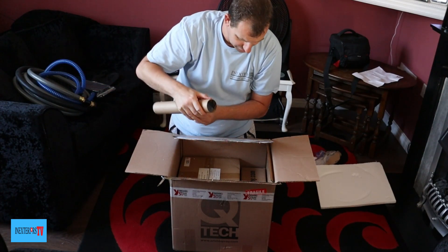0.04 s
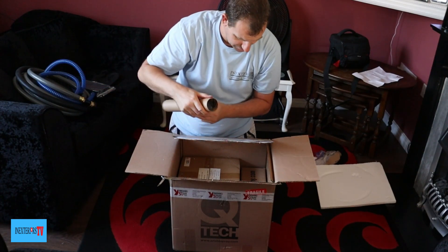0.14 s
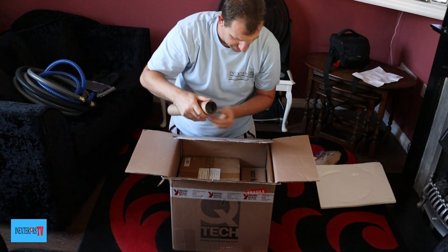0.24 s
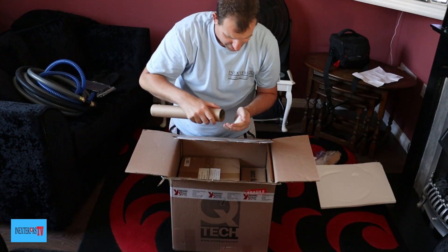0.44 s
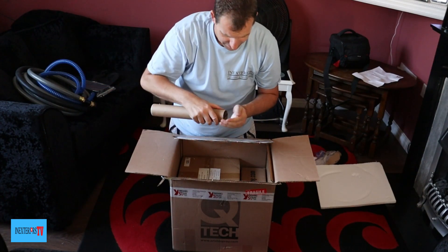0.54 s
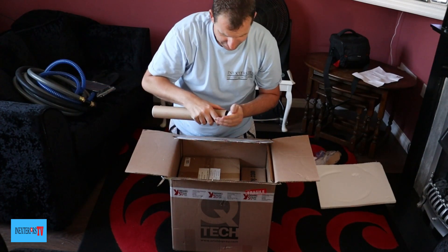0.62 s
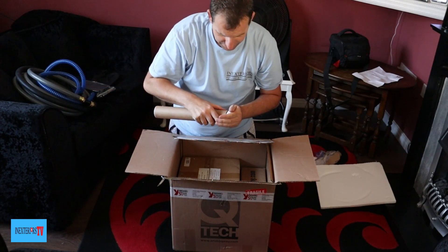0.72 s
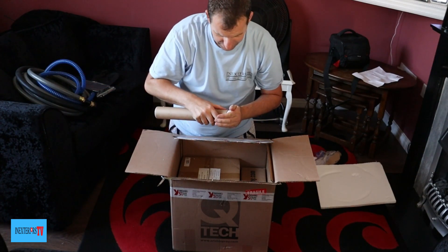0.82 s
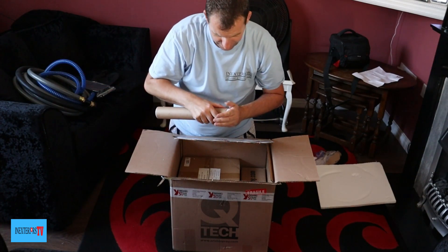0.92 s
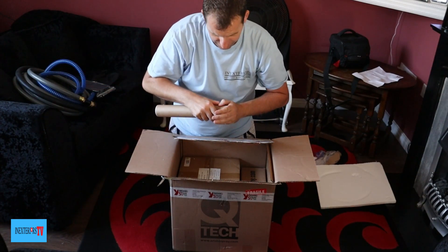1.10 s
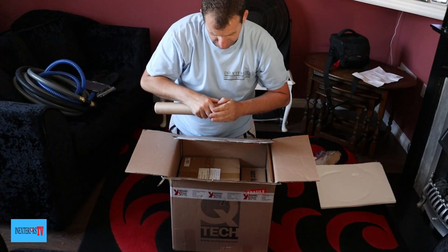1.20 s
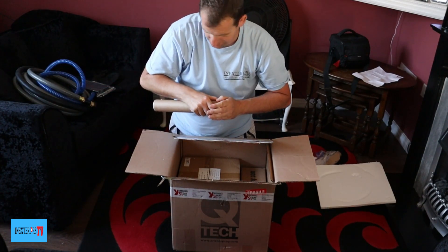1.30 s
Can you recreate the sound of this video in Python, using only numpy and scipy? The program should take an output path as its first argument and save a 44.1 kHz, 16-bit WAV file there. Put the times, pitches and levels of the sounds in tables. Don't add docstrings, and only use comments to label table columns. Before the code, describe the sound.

A cap pops from a cardboard tube with a low hollow boom and rattles in its mouth, after light finger rubs and taps; softer scuffs and dull box bumps follow in a furnished room, with faint hum and hiss.

```python
import sys
import numpy as np
from scipy import signal
from scipy.fft import rfft, irfft
from scipy.io import wavfile
from scipy.ndimage import uniform_filter1d

SR = 44100
rng = np.random.default_rng(int(sys.argv[2]) if len(sys.argv) > 2 else 0)


def undo_db(level):
    steps = np.asarray(level, float) / 20
    return 10 ** steps


def generate_wav(sig):
    pcm = np.round(np.clip(np.atleast_2d(sig).T, -1, 1) * 32767).astype(np.int16)
    wavfile.write(sys.argv[1], SR, pcm)


N = 59535
T = np.arange(N) / SR
POP_S = .2237


def col(table, k):
    a = np.array(table)
    return np.interp(T, a[:, 0], a[:, k])


def unit(x):
    return x / np.sqrt(np.mean(x ** 2))


def clicks(times, db):
    x = np.zeros(N)
    np.add.at(x, (np.asarray(times) * SR).astype(int), undo_db(np.asarray(db)))
    return x


def ring(x, hz, t60):
    pole = np.exp(2j * np.pi * hz / SR - np.log(1000) / (t60 * SR))
    return signal.lfilter([1], [1, -pole], x).imag


def flutter():
    depth_db, smooth_s = 3, .008
    k = int(smooth_s * SR)
    walk = uniform_filter1d(uniform_filter1d(rng.standard_normal(N), k), k)
    return undo_db(depth_db * unit(walk))


def modes(x, table):
    return sum((-1) ** k * undo_db(db) * flutter() * ring(x, hz, t60) for k, (hz, db, t60) in enumerate(table))


def bands(x, table):
    return sum(undo_db(db) * signal.lfilter(*signal.iirpeak(hz, hz / width, SR), x) for hz, width, db in table)


def twice(x, hz, width):
    return bands(bands(x, [(hz, width, 0)]), [(hz, width, 0)])


def burst(x, fade_s):
    envelope = signal.lfilter([1], [1, -np.exp(-1 / (fade_s * SR))], x)
    return envelope * rng.standard_normal(N)


def swells(table):
    out = np.zeros(N)
    for s, rise, hz, db, t60 in table:
        age = np.clip(T - s, 0, None)
        swell = 1 - np.exp(-(age / rise) ** 2)
        out += undo_db(db - 60 * age / t60) * swell * np.sin(2 * np.pi * hz * age)
    return out


# t/s, level/dB
HUM_LEVEL = [
    (0, -63),
    (.3, -58.5),
    (.6, -55),
    (.9, -50),
    (1.35, -50),
]


def mains_hum():
    return np.sqrt(2) * undo_db(col(HUM_LEVEL, 1)) * np.sin(2 * np.pi * 50.1 * T + 2.4)


# f/Hz, level/dB per Hz
HISS_COLOUR = [(40, 1), (100, -10), (220, -8.5), (500, -12.5), (900, -11.5), (2200, -21.5), (5000, -24),
               (16000, -27.5)]


def hiss():
    hz, db = np.array(HISS_COLOUR).T
    f = np.fft.rfftfreq(N, 1 / SR) + 1
    colour = undo_db(np.interp(np.log(f), np.log(hz), db))
    return undo_db(-53) * unit(irfft(rfft(rng.standard_normal(N)) * colour, N))


# f/Hz, width/Hz, level/dB
SKIN = [(508, 63, -6), (650, 48, -1.5), (910, 413, 7.5), (1180, 570, -26), (2155, 520, 3.5),
        (2700, 750, -2), (3666, 860, -0.5), (5020, 260, -1)]


def skin(x):
    return signal.lfilter(*signal.butter(2, 5000, fs=SR), bands(x, SKIN))


RUB_STARTS = [.455, .525, .75, -.004, 1.152, 1.12, 1.185, .08, 1.135, 1.2, .49, .8, -.01, .125]
# length/s, f/Hz, width/Hz, level/dB
RUBS = [(0.046, 1700, 150, -58), (0.027, 1070, 150, -50), (0.12, 1326, 130, -54), (0.015, 3240, 4200, -30),
        (0.019, 900, 450, -38), (0.1, 280, 190, -49.5), (0.017, 654, 100, -51), (0.037, 490, 35, -61),
        (0.057, 2020, 580, -47), (0.022, 860, 80, -43.5), (0.047, 2530, 300, -45), (0.052, 4250, 1700, -50),
        (0.19, 4200, 5900, -45), (0.076, 3600, 3900, -42.5)]


def rubs():
    noise = rng.standard_normal(N)
    out = np.zeros(N)
    for s, (length, hz, width, db) in zip(RUB_STARTS, RUBS):
        arch = np.sin(np.pi * np.clip((T - s) / length, 0, 1))
        out += undo_db(db) * arch * unit(twice(noise, hz, width))
    return out


# f/Hz, width/Hz, level/dB
PAPER = [(6000, 2100, -2), (8800, 2900, -12), (10480, 1000, -9), (11800, 560, -14), (15300, 1400, -20)]


def paper(x, extra=()):
    return bands(x, PAPER + list(extra))


# t/s, pressure level/dB, crispness level/dB
SCUFF = [(0, -41, -9), (.05, -42.5, -6.5), (.11, -37, -15), (.2, -43.5, -4.5), (.29, -35.5, -6.5),
         (.37, -50.5, -9), (.46, -50.5, -10), (.5, -39.5, -8), (.58, -63, -10), (.68, -98, -5),
         (.7, -55.5, -36), (.79, -56, -16), (.82, -44.5, -6.5), (.9, -60, -8.5), (1.02, -51.5, -8.5),
         (1.09, -60.5, -8), (1.17, -45, -7.5), (1.35, -61.5, -10)]


def scuff():
    grains_per_s, spread_db, smooth_share = 4000, 2.5, .7
    chosen = rng.random(N) < grains_per_s / SR
    slips = chosen * undo_db(spread_db * rng.exponential(size=N)) * rng.standard_normal(N)
    friction = unit(np.clip(slips, -4, 4)) + smooth_share * rng.standard_normal(N)
    crisp = undo_db(col(SCUFF, 2)) * unit(paper(friction, [(6230, 2400, 0)]))
    air = undo_db(-9) * unit(ring(friction, 223.7, .13))
    return undo_db(col(SCUFF, 1)) * (unit(skin(friction)) + crisp + air)


# t/s, body level/dB, bright snap level/dB, length/s
TAPS = [(0, -43.5, -30.5, 0.0074), (.008, -33, -45, 0.00079), (0.04, -58, -47, 0.0021),
        (0.065, -54, -31.5, 0.0037), (0.09, -53, -32, 0.002), (0.103, -27.5, -26.5, 0.0028),
        (0.1082, -31, -19.5, 0.0021), (0.111, -33.5, -29, 0.007), (0.133, -38, -35, 0.0074),
        (0.4786, -33.5, -36, 0.0031), (0.4855, -37, -33, 0.0024), (0.496, -38.5, -62, 0.004),
        (0.501, -33, -56, 0.0033), (0.51, -69, -50, 0.012), (0.696, -68, -54.5, 0.014),
        (0.798, -44.5, -45, 0.004), (0.809, -45.5, -57, 0.009), (0.821, -37, -57, 0.0047),
        (0.847, -57, -62, 0.0079), (0.867, -71, -65, 0.0033), (0.937, -55, -72, 0.019),
        (1.012, -47, -76, 0.0049), (1.098, -49, -70, 0.017), (1.115, -44.5, -54, 0.015),
        (1.152, -41, -53, 0.0048), (1.189, -42.5, -61, 0.0074), (1.232, -49, -58, 0.0048),
        (1.249, -55, -60, 0.0056), (1.28, -69, -64, 0.0026), (1.287, -47, -70, 0.0082)]


def taps():
    rise_s = .0016
    body, snap = np.zeros(N), np.zeros(N)
    for s, body_db, snap_db, length in TAPS:
        age = np.abs(T - s)
        shape = (T > s) * np.exp(-age / length) * (1 - np.exp(-age / rise_s))
        body += undo_db(body_db) * shape
        snap += undo_db(snap_db) * shape
    body *= rng.standard_normal(N)
    snap *= rng.standard_normal(N)
    return undo_db(7) * skin(body) + undo_db(9) * paper(snap)


PING_STARTS = [.262, .255, .272, .25, .315, .31, .318, .32, .31, .388, .405, .46, .1082, .1085, .008, .03,
               .022, .117, .762, .823, .825, .852, .876, 1.006, 1.035, 1.116, 1.119, 1.118, 1.124, 1.154,
               1.191, 1.184, 1.212, 1.236, 1.246, 1.272, 1.273, 1.29, 1.291, .2245, .2265]
PING_PITCHES = [500, 362, 870, 1060, 800, 680, 488, 1104, 296, 455, 1350, 1120, 10700, 12100, 12000, 11000,
                2200, 2250, 1180, 2080, 850, 1020, 900, 2090, 900, 3800, 860, 2250, 2050, 2090, 673, 4700,
                860, 2050, 900, 880, 2100, 860, 2150, 1354, 424]
# rise/s, level/dB, t60/s
PINGS = [(0.0049, -29.5, 0.18), (0.0077, -28, 0.096), (0.003, -30, 0.068), (0.0077, -26, 0.048),
         (0.0072, -27.5, 0.16), (0.0097, -35.5, .22), (0.009, -36, 0.24), (0.0051, -32, 0.14),
         (0.014, -45.5, 0.57), (0.0053, -44, 0.19), (0.0092, -45.5, 0.15), (0.011, -42, 0.28),
         (0.00024, -16, 0.0072), (0.00038, -17, 0.0078), (0.00046, -24, .006), (.0005, -34, 0.013),
         (0.0021, -38, .04), (0.0022, -30.5, 0.047), (0.0051, -41, .07), (0.0016, -35.5, 0.03),
         (0.0022, -39.5, 0.071), (0.0036, -38, .06), (.001, -38, 0.035), (0.0017, -44, 0.036),
         (0.0036, -44.5, .07), (0.0009, -54, 0.015), (0.0015, -36.5, 0.048), (0.00073, -45, 0.017),
         (0.00093, -37.5, 0.033), (0.00091, -29.5, 0.028), (0.0015, -35, 0.048), (0.00085, -42, .015),
         (.003, -39, 0.054), (0.0017, -40, 0.036), (.003, -42, .06), (0.0013, -39, 0.032),
         (0.0017, -40.5, 0.031), (0.0015, -40.5, .06), (0.0025, -41, 0.038), (.002, -26.5, 0.04),
         (0.0038, -26, 0.059)]


def pings():
    grains = zip(PING_STARTS, PING_PITCHES, PINGS)
    return swells([(s, rise, hz, db, t60) for s, hz, (rise, db, t60) in grains])


# t/s, level/dB, f/Hz
BUMPS = [
    (.05, -41, 82),
    (0.086, -39, 139),
    (1.123, -36, 92),
    (1.16, -38, 92),
    (1.1, -54, 92),
]


def bumps():
    return sum(ring(uniform_filter1d(clicks([s], db), size=200), hz, .12) for s, db, hz in BUMPS)


# t/s, rise/s, f/Hz, level/dB, t60/s
STIRS = [
    (.092, 0.033, 223.9, -24.5, 0.32),
    (0.489, 0.0021, 300, -40, 0.081),
    (0.826, 0.0028, 228.5, -33.5, 0.16),
    (.872, 0.0059, 469, -37, 0.11),
    (1.152, 0.0029, 231, -47, 0.15),
    (1.215, 0.0092, 222, -66, 0.11),
    (.74, 0.017, 225, -51.5, 0.26),
]


def stirs():
    return swells(STIRS)


# t/s, level/dB
BOOM = [
    (.224, -12.5),
    (.242, -11.5),
    (.258, -15),
    (.3, -17),
    (.318, -30.5),
    (.338, -29),
    (.416, -39),
    (.456, -47),
    (.6, -64),
]


def boom():
    rise = np.clip((T - POP_S) / .002, 0, 1) * (T < BOOM[-1][0])
    tone = np.sin(2 * np.pi * 226.3 * (T - POP_S) - 1.5)
    return np.sqrt(2) * rise * undo_db(col(BOOM, 1)) * tone


# f/Hz, level/dB, t60/s
WALL = [(343, -17.5, 0.054), (420, -8, 0.052), (479, -18, 0.056), (506, -9.5, 0.043), (656, -11.5, 0.083),
        (688, -10.5, 0.094), (712, -9.5, 0.05), (806.3, -8.5, 0.13), (855, -3, 0.052), (958, -1.5, 0.016),
        (1055, -5.5, 0.057), (1356, -2.5, 0.032), (1670, -6.5, 0.02), (2074, -2, 0.04)]


def wall(blows):
    push = np.hanning(int(.00055 * SR) + 3)
    return modes(np.convolve(blows, push / push.sum())[:N], WALL)


# f/Hz, level/dB, t60/s
CAP = [(2286, -12, 0.028), (2350, -9.5, 0.15), (2516, 5.5, 0.007), (2530, -9, 0.091), (2640, -5.5, 0.0029),
       (2847, -9.5, 0.028), (3750, -11.5, 0.012), (5140, -29, 0.0023)]


def cap(blows):
    return undo_db(-3.5) * twice(modes(blows, CAP), 2920, 1940)


def rasp(blows):
    return bands(burst(blows, .0038), [(5430, 1500, 10), (8700, 4300, -3), (14200, 1700, -24)])


def crack():
    puff = burst(clicks([POP_S + .0015], -16), .0047)
    return bands(bands(puff, [(2520, 2340, 0)]), [(2610, 2430, 2.7)])


# t/s, level/dB, wall share/dB, rasp level/dB
RATTLES = [(0.2243, -17, -19, -54), (.2408, -13, -5, -38), (0.2436, -29, -2, -41), (.251, -30, 4, -37),
           (.271, -14, -6, -35.5), (0.2777, -19, -14, -41), (0.285, -49, -26, -43.5),
           (0.2906, -28, 4, -39.5), (.297, -22, -10, -54), (0.304, -45, -11, -50), (.321, -31, -6, -50),
           (0.39, -29, -19, -48.5), (.411, -38, -7, -51), (0.434, -46, -21, -58), (.459, -36.5, -8, -57)]


def cap_knock():
    times, level, wall_share, rasp_level = np.array(RATTLES).T
    wall_blows = clicks([POP_S], -13) + clicks(times, level + wall_share)
    return wall(wall_blows) + crack() + rasp(clicks(times, rasp_level)) + cap(clicks(times, level))


def room(x):
    low_t60_s, top_t60_s, gap_s = .45, .3, .006
    t = T[:SR // 2]
    noise = rng.standard_normal(len(t))
    low = signal.lfilter(*signal.butter(1, 1500, fs=SR), noise)
    tail = low * undo_db(-60 * t / low_t60_s) + (noise - low) * undo_db(-60 * t / top_t60_s)
    tail *= t > gap_s
    return x + undo_db(-9) * signal.fftconvolve(x, tail / np.sqrt(np.sum(tail ** 2)))[:N]


def scene():
    knock = cap_knock()
    handling = rubs() + scuff() + taps() + pings()
    near = boom() + room(knock + handling) + undo_db(-13) * knock
    near = signal.sosfilt(signal.butter(4, 160, "high", fs=SR, output="sos"), near)
    return (near + stirs() + bumps() + mains_hum() + hiss())[None]


def low_pass(x):
    return signal.sosfilt(signal.butter(12, 16150, fs=SR, output="sos"), x)


def record(dry):
    x = signal.sosfilt(signal.butter(3, 35, "high", fs=SR, output="sos"), dry)
    x = signal.sosfilt(signal.ellip(10, .5, 60, 15800, fs=SR, output="sos"), x)
    return low_pass(x)


dry = scene()
out = record(dry)
generate_wav(out)
```